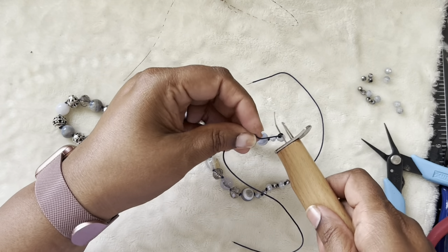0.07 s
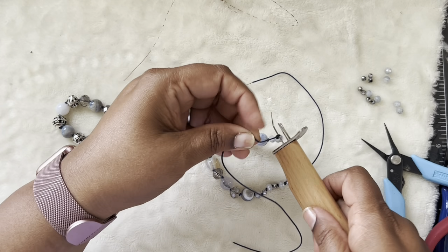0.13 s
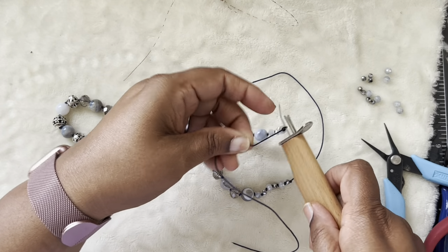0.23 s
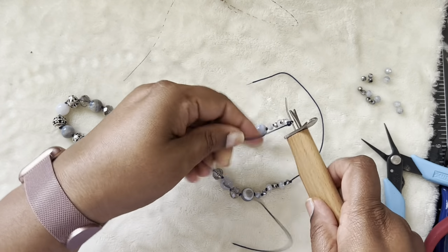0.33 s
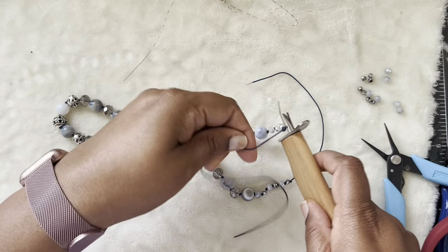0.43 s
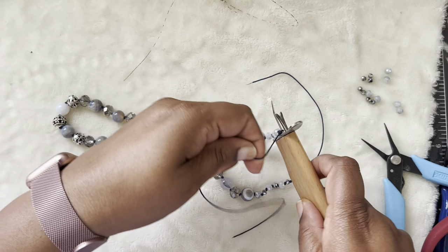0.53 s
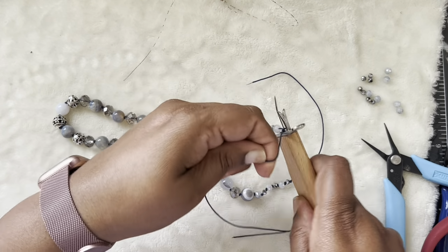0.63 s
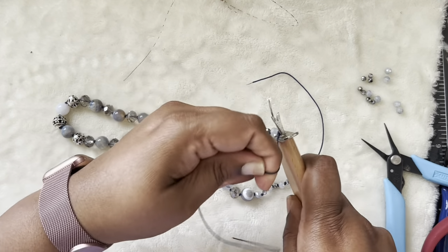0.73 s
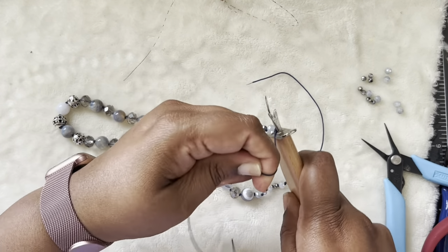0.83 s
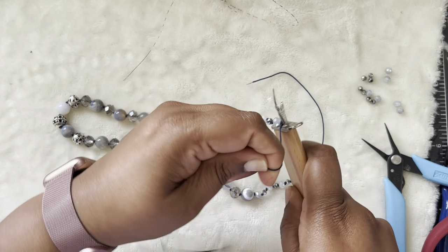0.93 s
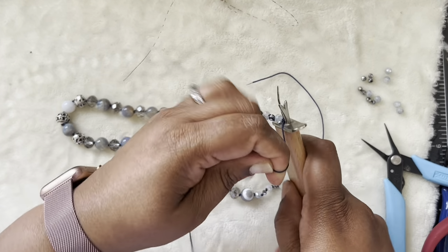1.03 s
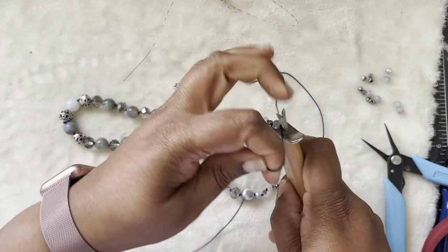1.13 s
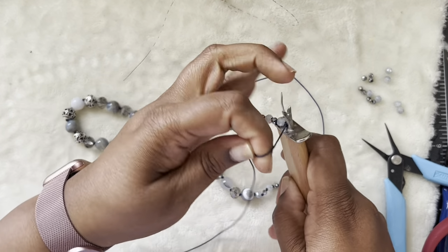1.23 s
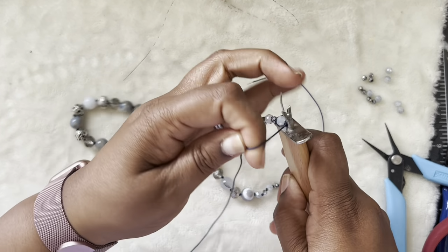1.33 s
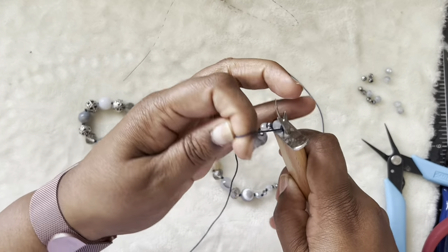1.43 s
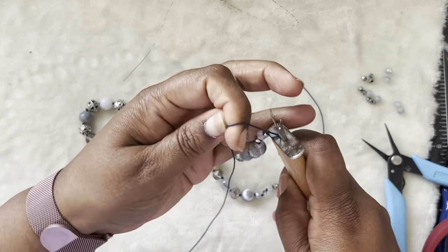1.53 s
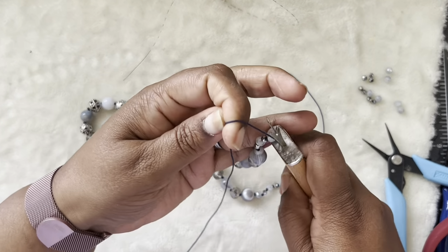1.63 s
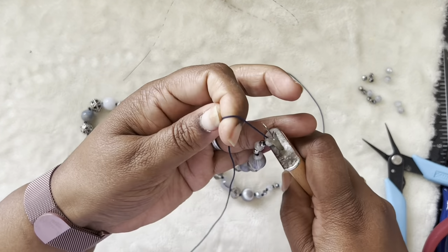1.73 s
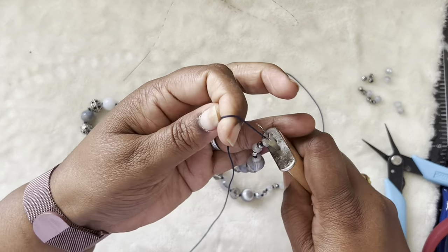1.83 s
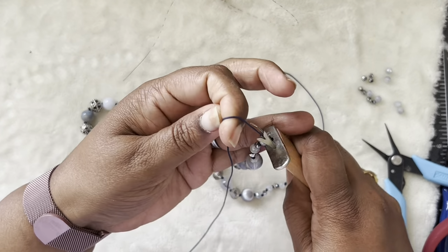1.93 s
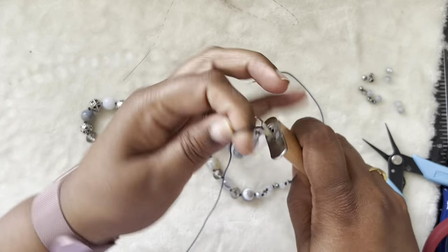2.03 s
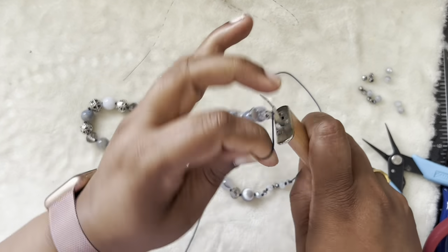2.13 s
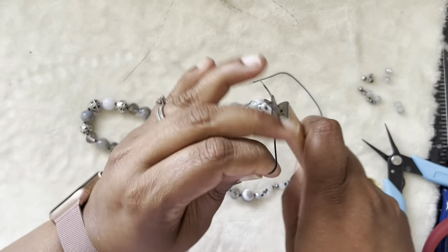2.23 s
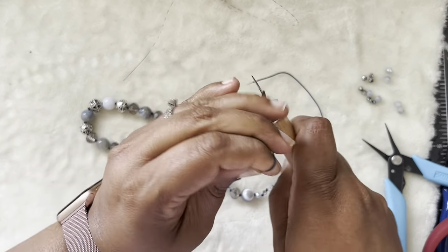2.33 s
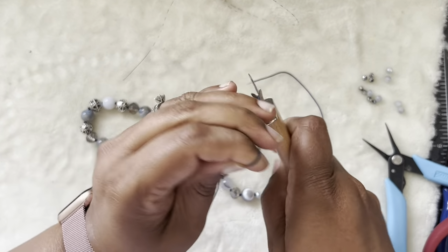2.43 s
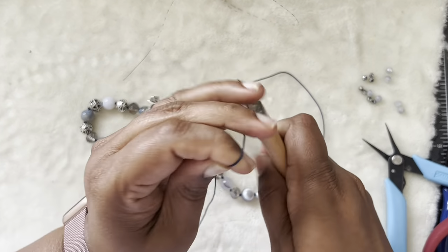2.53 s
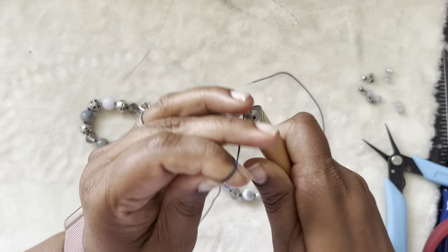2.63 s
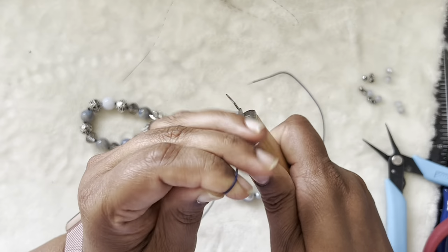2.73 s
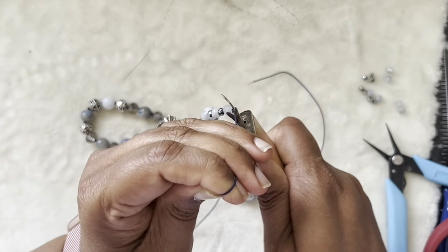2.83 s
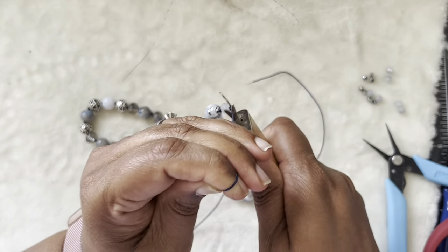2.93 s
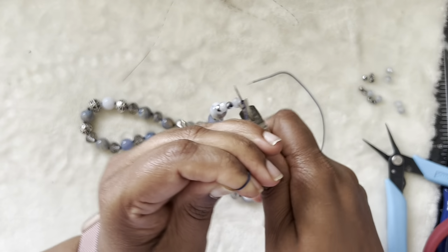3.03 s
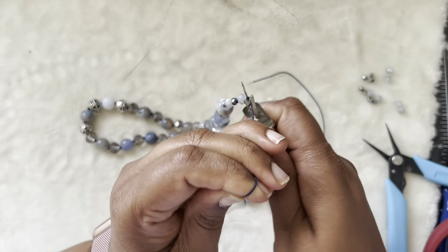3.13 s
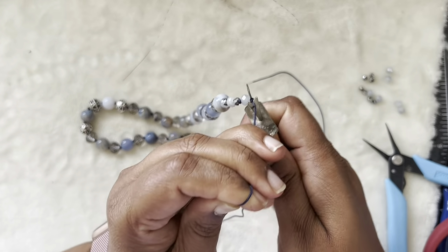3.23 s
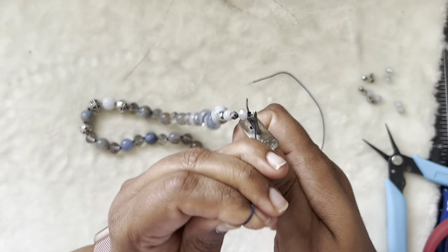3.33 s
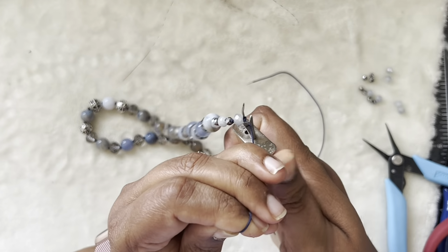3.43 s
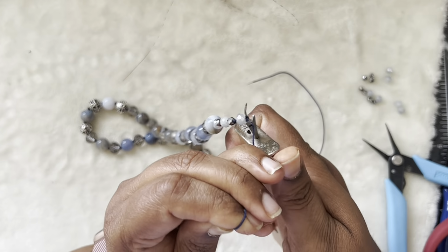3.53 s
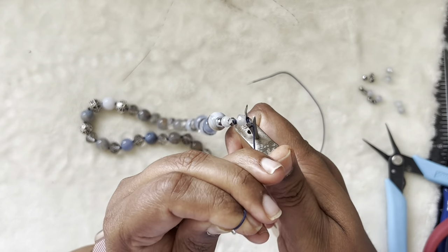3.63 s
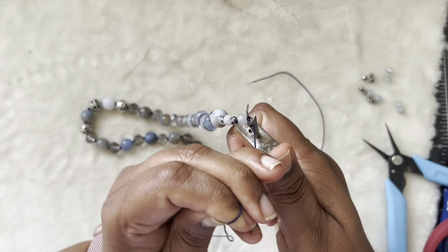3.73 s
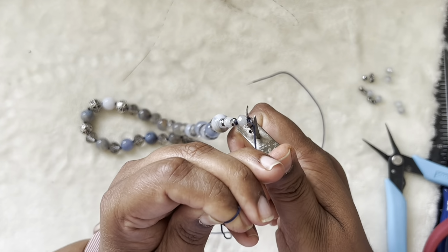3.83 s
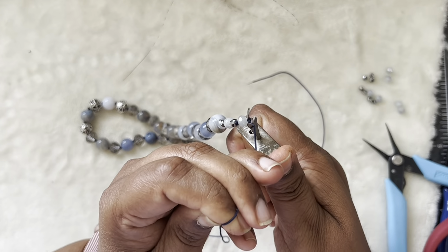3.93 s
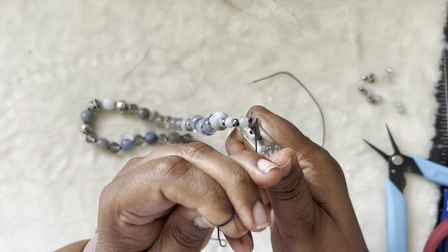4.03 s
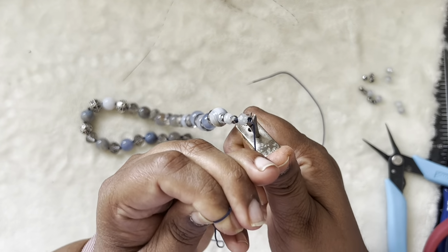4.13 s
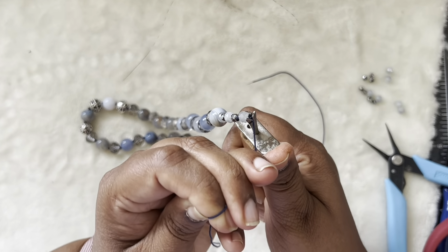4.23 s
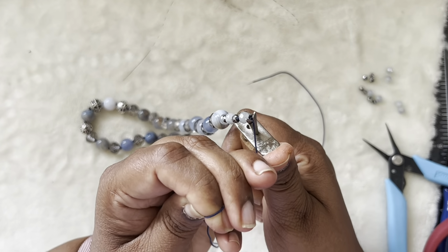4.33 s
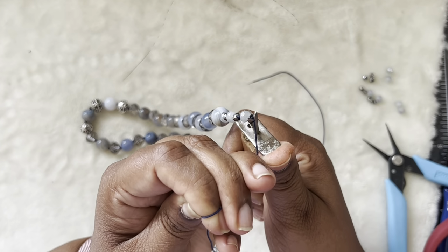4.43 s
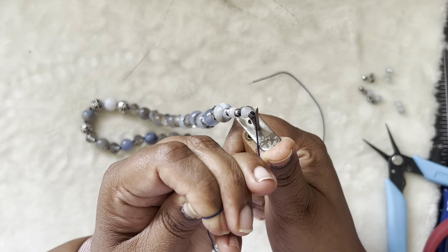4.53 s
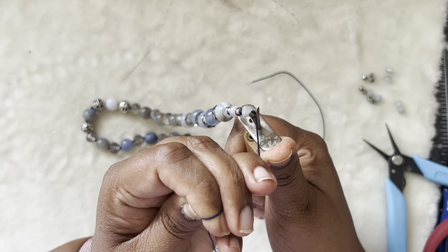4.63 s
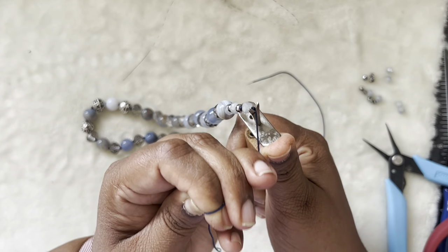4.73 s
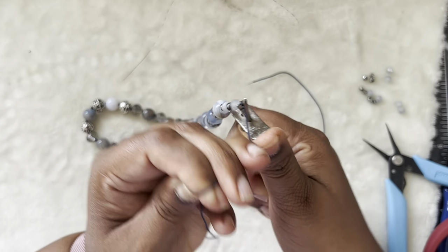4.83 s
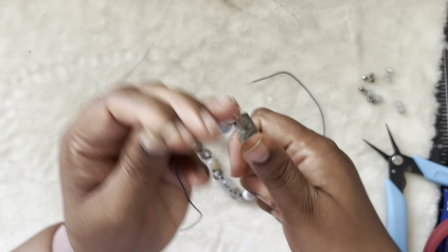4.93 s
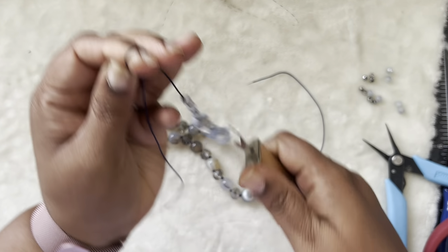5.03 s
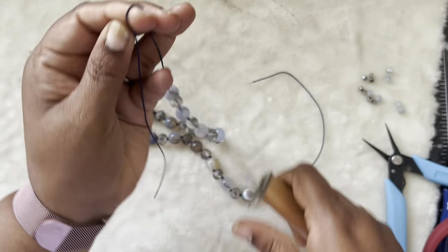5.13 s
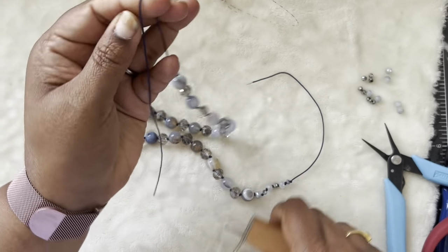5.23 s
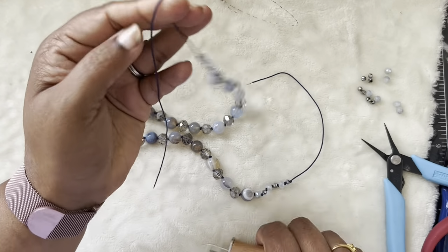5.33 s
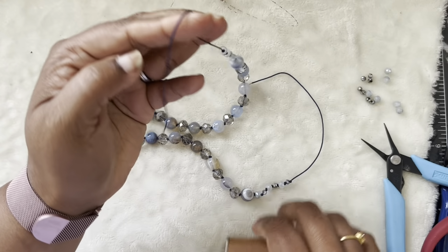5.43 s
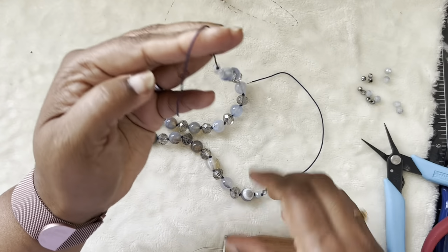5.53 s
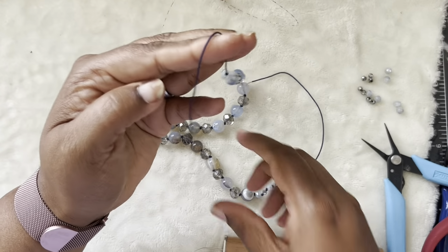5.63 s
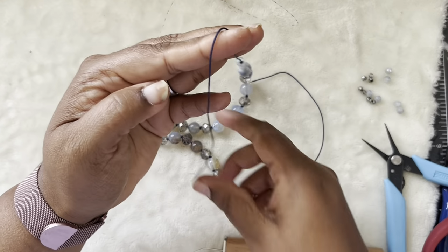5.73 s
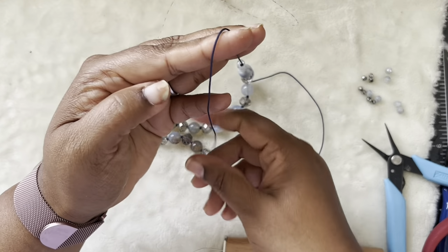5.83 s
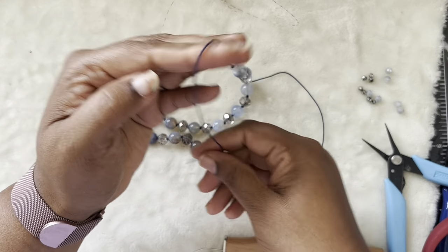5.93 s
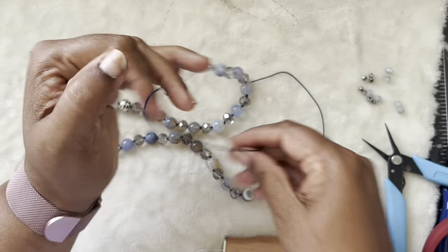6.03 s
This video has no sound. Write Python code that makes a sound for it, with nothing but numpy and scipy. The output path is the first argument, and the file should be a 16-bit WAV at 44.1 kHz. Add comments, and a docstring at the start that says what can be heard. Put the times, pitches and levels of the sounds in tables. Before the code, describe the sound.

Close above a cloth-covered table in a small, fairly dry room, hands knot cord between beads. Faint bright ticks and brief gritty cord scrapes with thin squeaks come first, over low motor hum and rumble. A distant soft whoosh swells and fades. After a quieter stretch, ticks gather into a sharp metal snap, cord rubs again, then the tool lands with a hard clack and dull thud, followed by soft cloth brushing and a last low bump.

```python
"""Hands knot a cord between small stone beads with a wood-handled metal tool, over a cloth-covered table.
From the start the rubbed cord squeaks, beads tick as short rings and the cord drags as gritty filtered noise.
A far whoosh, slow noise in one band, swells and fades; from 2.6 s hands also brush the cloth.
At 4.5 s the tool's sprung head snaps, at 5.3 s the tool is set down: chattering contacts strike their modes.
Motor and mains hum (sines) and room rumble (noise) run throughout; a close two-port microphone listens above."""
import sys
import numpy as np
from scipy import signal
from scipy.fft import rfft, irfft, next_fast_len
from scipy.io import wavfile

SR = 44100
rng = np.random.default_rng(int(sys.argv[2]) if len(sys.argv) > 2 else 0)


def invert_db(x):
    """Field ratio 10**(x/20) for x, a level in decibels (scalar or array-like)."""
    u = np.asarray(x, float) / 20
    return 10 ** u


def materialize(psi):
    """Save the field psi as 16-bit PCM at rate SR to the path in sys.argv[1].

    A 1-D psi becomes a single channel; in a 2-D psi each row is a channel.
    """
    bounded = np.clip(np.atleast_2d(psi).T, -1, 1)
    quanta = np.round(bounded * 32767).astype(np.int16)
    wavfile.write(sys.argv[1], SR, quanta)


N = 268039


def at_hz(points, hz):
    """Reads a curve between its points on a log frequency axis."""
    f, value = np.transpose(points)
    return np.interp(np.log(hz), np.log(f), value)


def rms_one(x):
    """Scales to an rms of one."""
    return x / np.sqrt(np.mean(x ** 2) + 1e-20)


def peak_one(x):
    """Scales to a peak of one."""
    return x / np.max(np.abs(x) + 1e-20)


def band(x, low_hz, high_hz):
    """A band with gentle edges."""
    sos = signal.butter(2, [low_hz, min(high_hz, .45 * SR)], "band", fs=SR, output="sos")
    return signal.sosfilt(sos, x)


def steep(x, low_hz, high_hz):
    """A band with steep edges."""
    return band(band(x, low_hz, high_hz), low_hz, high_hz)


def ring(x, hz, t60):
    """A resonance: a unit click sets a decaying sine of starting height 1 ringing."""
    r, w = invert_db(-60 / (t60 * SR)), 2 * np.pi * hz / SR
    return signal.lfilter([0, np.sin(w)], [1, -2 * r * np.cos(w), r * r], x + 1e-18)


def add(out, s, x):
    """Lays a short sound into out from time s on."""
    at = round(s * SR)
    out[at:at + len(x)] += x[:N - at]


def contact(ms, size):
    """Hard surfaces chatter for a moment: noise that rises fast and dies."""
    t = np.arange(size) / SR * 1000 / max(ms, .1)
    return rng.standard_normal(size) * np.sqrt(t) * np.exp(-1.6 * t)


def grit(size, spread_db):
    """Fibres catch unevenly: noise with a long-tailed size."""
    catch_db = spread_db * np.minimum(rng.exponential(1, size), 5)
    return rms_one(rng.standard_normal(size) * invert_db(catch_db))


def slipping(size, slip_db):
    """Stick and slip: gritty noise whose level flutters at 25-100 Hz."""
    flutter = rms_one(band(rng.standard_normal(size), 25, 100))
    return invert_db(slip_db * flutter) * grit(size, spread_db=3.5)


def swell(start, top, end, peak_db, roundness):
    """Gain of one movement, up to its peak and back; roundness (rise, fall): 1 is straight in dB, more is fuller."""
    quiet_db = -98
    t = np.arange(round(start * SR), round(end * SR)) / SR
    rise = np.abs((top - t) / (top - start)) ** roundness[0]
    fall = np.abs((t - top) / (end - top)) ** roundness[1]
    away = np.where(t < top, rise, fall)
    gain = invert_db(peak_db + (quiet_db - peak_db) * away) * signal.windows.tukey(len(t), .1)
    return gain[t >= 0]


def ticks():
    """Each touch rings a few cycles at its own pitch, with a crack around it, a dull knock and a bright edge."""
    # beads and prongs touching: t/s, peak level/dB, ring f/Hz, dull knock level/dB, bright edge level/dB
    touches = [(0.0415, -60, 6000, -92, -93), (0.2978, -68, 7240, -80, -65),
               (0.3108, -55.5, 5640, -77, -56.5), (0.639, -51, 5400, -77, -45),
               (0.6507, -55, 3950, -85, -44), (0.8687, -67.5, 2860, -67.5, -62),
               (0.9616, -65, 2800, -83, -71), (1.0274, -56, 6300, -82, -56), (1.046, -50, 6700, -66, -54),
               (1.0848, -50.5, 3250, -70, -48.5), (1.2557, -65.5, 3250, -82, -78),
               (1.3981, -63.5, 3400, -83, -51.5), (1.5454, -70, 2230, -70, -85),
               (1.5907, -63.5, 5300, -72.5, -72), (1.6844, -66, 5930, -78, -81),
               (1.723, -76, 3070, -75, -68), (1.7988, -63.5, 5600, -85, -78), (1.9684, -70, 7490, -77, -66),
               (1.9866, -59, 6200, -78, -54.5), (2.1087, -43, 5900, -70, -75),
               (2.1817, -51.5, 3230, -70, -50.5), (2.8766, -69.5, 2600, -78, -77),
               (2.923, -60, 6550, -65, -60.5), (3.059, -58, 5300, -61, -51),
               (3.0863, -47, 3560, -57.5, -34), (3.9498, -67, 5940, -73, -67),
               (3.9826, -64.5, 7280, -73, -65), (3.995, -69, 2600, -80, -82),
               (4.0118, -69, 7250, -74, -66.5), (4.0495, -67, 7360, -80, -67),
               (4.0848, -64, 6000, -75, -62), (4.121, -62, 7300, -74, -60),
               (4.1521, -51.5, 6650, -64.5, -51), (4.1906, -62, 6350, -76, -61),
               (4.2834, -59, 6560, -66, -57), (4.3851, -50.5, 6500, -59.5, -54),
               (4.481, -47.5, 4700, -58.5, -49), (4.5668, -43, 5000, -64, -45.5),
               (4.823, -54.5, 4900, -66, -66), (4.894, -54, 6800, -72, -47), (4.925, -44.5, 3940, -74, -33),
               (4.9303, -67, 2410, -54, -64), (5.0152, -70, 7340, -87, -67),
               (5.2281, -62, 2380, -47.5, -75), (5.418, -51, 3370, -52, -82),
               (6.058, -69, 2580, -54, -80.5)]
    out = np.zeros(N)
    for s, peak_db, hz, knock_db, edge_db in touches:
        hit = contact(ms=1.2, size=1500)
        crack = steep(hit, .45 * hz, 7800)
        body = peak_one(ring(crack, hz, 20 / hz)) + invert_db(-4) * peak_one(crack)
        knock = peak_one(steep(hit, 1000, 1900))
        edge = peak_one(steep(hit, 6200, 15500))
        add(out, s, invert_db(peak_db) * peak_one(body) + invert_db(knock_db) * knock + invert_db(edge_db) * edge)
    return out


def slides():
    """Gritty friction of the cord: a scrape coloured by the prongs and a bright hiss."""
    # drags over beads and prongs: start t/s, peak t/s, end t/s, broad scrape level/dB, bright hiss level/dB
    drags = [(0.283, 0.303, 0.42, -78, -75.5), (0.572, 0.64, 0.725, -70.5, -73),
             (0.943, 1.003, 1.16, -78, -80), (1.004, 1.042, 1.085, -66.5, -64),
             (1.485, 1.498, 1.525, -82, -99), (2.104, 2.13, 2.26, -78.5, -82.5),
             (2.491, 2.536, 2.63, -79.5, -73), (2.715, 2.753, 2.8, -85, -83),
             (2.954, 3.003, 3.06, -76.5, -72.5), (2.989, 3.045, 3.19, -72.5, -69.5),
             (3.309, 3.35, 3.44, -81, -95), (4.757, 4.834, 4.9, -70.5, -83), (4.803, 4.912, 5.01, -64, -59)]
    # prong resonances under the cord: f/Hz, width/Hz, mean level/dB (varies from drag to drag)
    prong_modes = [(3680, 470, -5), (5100, 250, 0.5), (6000, 490, -4), (7430, 250, -3)]
    scrape_round, hiss_round = (1.8, 1.37), (1.76, 1.03)
    out = np.zeros(N)
    for start, top, end, scrape_db, hiss_db in drags:
        push = swell(start, top, end, scrape_db, scrape_round)
        rub = slipping(len(push), slip_db=1.9)
        prongs = rms_one(sum(invert_db(db + rng.normal(0, 2.5)) * rms_one(ring(rub, hz, 0.98 / width))
                             for hz, width, db in prong_modes))
        scrape = rms_one(rms_one(steep(rub, 1660, 5700)) + invert_db(3.5) * prongs)
        hiss = rms_one(band(band(rub, 6140, 11500), 6000, 18000))
        add(out, start, push * scrape + swell(start, top, end, hiss_db, hiss_round) * hiss)
    return out


def cord_squeaks():
    """Narrow squeaks of the rubbed cord: stick-slip noise coloured by its free length or by the tool's prongs."""
    # squeaks: start t/s, peak t/s, end t/s, squeak level/dB, squeak f/Hz
    squeaks = [(-0.08, 0.037, 0.1, -71.5, 5200), (0.066, 0.093, 0.16, -65, 5170),
               (0.148, 0.202, 0.28, -80, 5100), (0.288, 0.308, 0.4, -70, 5270),
               (0.596, 0.651, 0.69, -64, 5500), (0.6, 0.64, 0.72, -68, 4200),
               (1.047, 1.096, 1.16, -82, 2800), (1.216, 1.26, 1.31, -79, 3200),
               (2.12, 2.167, 2.27, -76.5, 3000), (2.72, 2.754, 2.8, -83, 2600),
               (3.31, 3.35, 3.41, -84, 2290), (4.754, 4.798, 4.96, -71.5, 3750),
               (4.758, 4.83, 4.95, -71, 5100)]
    half_width_hz = 400
    out = np.zeros(N)
    for start, top, end, squeak_db, hz in squeaks:
        gain = swell(start, top, end, squeak_db, roundness=(1.6, 1.2))
        rub = slipping(len(gain), slip_db=3.5)
        squeak = rms_one(steep(rub, hz - half_width_hz, hz + half_width_hz))
        add(out, max(start, 0), gain * squeak)
    return out


def blow(event, modes):
    """One chattering contact cracks and strikes every mode; loose parts rattle on, rubbing the modes more evenly."""
    out, size = np.zeros(N), 9000
    s, peak_db, ms, rattle_db, rattle_s = event
    t = np.arange(size) / SR
    both = np.array([contact(ms, size), slipping(size, slip_db=1.8)])  # strike, rub
    crack, chatter = steep(both, 2800, 13500) + invert_db(-5) * band(both, 800, 1900)
    struck, rubbed = 0, 0
    for hz, db, t60 in modes:
        strike, rub = steep(both, hz / 1.13, hz * 1.13)
        struck = struck + invert_db(db) * peak_one(ring(strike, hz, t60))
        rubbed = rubbed + invert_db(.55 * db) * rms_one(ring(rub, hz, t60))
    rings = peak_one(struck) + invert_db(-8.5) * peak_one(crack)
    rattle = rms_one(rubbed) + invert_db(-3.0) * rms_one(chatter)
    rattle_gain = invert_db(rattle_db - 60 * t / rattle_s) * (1 - np.exp(-t / .003))
    add(out, s, invert_db(peak_db) * peak_one(rings) + rattle_gain * rms_one(rattle))
    return out


def head_snap():
    """The sprung head snaps back and its contact excites the short modes of the head."""
    # the snap: t/s, peak level/dB, contact time/ms, rattle level/dB, rattle t60/s
    snap = (4.5017, -16.5, 1.25, -48.5, 0.19)
    # modes of the head: f/Hz, relative level/dB, t60/s
    head_modes = [(3250, -16, 0.0067), (3730, -2, 0.01), (4450, -14, .008), (4900, -9, .008),
                  (6500, -16, .008), (8500, -7, .008), (9050, -5.5, .007), (9590, -14, 0.0072),
                  (11550, -3, 0.0059), (11850, -5.5, 0.0095), (15400, -17.5, .004)]
    return blow(snap, head_modes)


def set_down():
    """The tool lands and its contact excites the modes of the whole tool."""
    # the landing: t/s, peak level/dB, contact time/ms, rattle level/dB, rattle t60/s
    landing = (5.2977, -14.5, .42, -53.5, .175)
    # modes of the whole tool: f/Hz, relative level/dB, t60/s
    tool_modes = [(940, -27, .009), (1260, -32, .009), (1560, -31, .01), (1900, -32, .008), (3000, -2, .01),
                  (3350, -4.5, .009), (4065, -15.5, 0.0099), (4690, -17.5, 0.0096), (5600, -20, .007),
                  (6850, -12, 0.013), (7980, -18.5, 0.013), (8600, -19, .007), (11300, -18.5, .013)]
    return blow(landing, tool_modes)


def thuds():
    """A soft push into the table top favours the table modes near its own pitch."""
    # pushes: t/s, peak level/dB, softness f/Hz
    pushes = [(3.058, -51, 630), (3.089, -57, 500), (4.0, -57, 200), (4.501, -45.5, 451.5),
              (4.505, -48.5, 160), (4.93, -61, 600), (5.004, -45.5, 150), (5.227, -51, 700),
              (5.295, -42.5, 300), (5.3, -30, 435), (5.301, -31.5, 188.4), (5.445, -52.5, 130),
              (6.029, -49, 160), (6.052, -38.5, 168), (6.058, -45, 450), (6.066, -50, 330)]
    # modes of the table top: f/Hz, mean level/dB (varies from push to push), t60/s
    table_modes = [(121, -1, 0.1), (163, 3, .12), (210, 0.5, .09), (240, 2, 0.088), (297, -5, 0.069),
                   (363, -1.5, 0.063), (430, -1, .06), (490, -0.5, 0.039), (630, -5.5, .03),
                   (800, -11, 0.016)]
    out, click = np.zeros(N), np.eye(1, 12000)[0]
    for s, peak_db, soft_hz in pushes:
        push = band(click, 0.65 * soft_hz, 1.6 * soft_hz)
        rings = sum(invert_db(db + rng.normal(0, 1.5)) * ring(push, hz, t60) for hz, db, t60 in table_modes)
        add(out, s, invert_db(peak_db) * peak_one(rings))
    return out


def cloth():
    """Soft, smooth friction: one dull resonance and a broad brush."""
    # a hand or forearm moves: start t/s, peak t/s, end t/s, ring level/dB, broad brush level/dB
    strokes = [(2.576, 2.68, 3.1, -76.5, -89), (5.17, 5.263, 5.42, -81, -79), (5.251, 5.53, 5.71, -78, -76),
               (5.903, 6.09, 6.2, -79, -80)]
    cloth_hz, cloth_t60_s, roundness = 1410, .007, (2.1, 2.2)
    out = np.zeros(N)
    for start, top, end, ring_db, brush_db in strokes:
        ring_gain = swell(start, top, end, ring_db, roundness)
        brush_gain = swell(start, top, end, brush_db, roundness)
        rub = slipping(len(brush_gain), slip_db=1.2)
        ringing = rms_one(ring(ring(rub, cloth_hz, cloth_t60_s), cloth_hz, cloth_t60_s))
        brush = rms_one(steep(rub, 850, 3700) + 1.2 * steep(rub, 900, 1500))
        add(out, start, ring_gain * ringing + brush_gain * brush)
    return out


def hum():
    """Steady sines; the two lowest beat slowly."""
    # motor turning just under mains speed, mains, twice mains: f/Hz, rms level/dB
    tones = [(57.2, -52.5), (59.9, -69), (119.9, -60)]
    t = np.arange(N) / SR
    return sum(np.sqrt(2) * invert_db(db) * np.sin(2 * np.pi * hz * t) for hz, db in tones)


def whoosh():
    """Diffuse noise around 700 Hz, about half alike on the two sides, swells and fades far away."""
    # course of the whoosh: t/s, level/dB
    course = [(0, -85), (.6, -89), (1.2, -85.5), (1.5, -80.5), (2.2, -79.5), (2.9, -79.5), (3.3, -82.5),
              (3.6, -96), (5, -94), (6.08, -93)]
    s, db = np.transpose(course)
    mid, side = band(band(rng.standard_normal((2, N)), 600, 900), 480, 950)
    gain = invert_db(np.interp(np.arange(N) / SR, s, db))
    return gain * rms_one(mid + 0.53 * side * [[1], [-1]])


def floor():
    """Room rumble and microphone hiss: bands of stereo noise, each with its own level and likeness."""
    # noise spectrum: f/Hz, level per Hz/dB
    spectrum = [(25, -103), (32, -91), (40, -75.5), (62, -70.5), (95, -75.5), (140, -85.5), (200, -103),
                (300, -104), (500, -110), (1000, -117), (2000, -122), (4000, -127), (8000, -129),
                (12000, -136), (16000, -140)]
    # left-right likeness: f/Hz, correlation (1 = the same on both sides)
    likeness = [(60, 0.94), (130, 0.94), (290, 0.3), (640, .25), (1400, .25), (3100, 0.88), (6800, 0.61),
                (15000, 0.24)]
    out, edges = 0, 24 * 2 ** np.arange(0, 9.6, .4)  # bands 0.4 octave wide
    white = rng.standard_normal((2, 2, N + SR))
    for k, (low, high) in enumerate(zip(edges, edges[1:])):
        mid, side = band(white[k % 2], low, high)[:, SR:]  # neighbouring bands use separate noise
        hz = np.sqrt(low * high)
        alike = np.clip(at_hz(likeness, hz), -1, 1)
        stereo = np.sqrt(1 + alike) * mid + np.sqrt(1 - alike) * side * [[1], [-1]]
        out = out + invert_db(at_hz(spectrum, hz)) * stereo
    return out * np.sqrt(SR / 4)  # brings the white noise to unit power per Hz


def room(x):
    """Eight feedback delays a side, duller on every round."""
    room_t60_s, wall_cut_hz = .26, 9000
    size = next_fast_len(N + SR)
    turn = np.exp(-2j * np.pi * np.arange(size // 2 + 1) / size)  # delay of one sample
    dull = np.exp(-2 * np.pi * wall_cut_hz / SR)
    wall = (1 - dull) / (1 - dull * turn)
    lags = (rng.uniform(.004, .02, (2, 8)) * SR).astype(int)
    spectrum = rfft(x, size)
    out = []
    for side in lags:
        loops = [invert_db(-60 * d / SR / room_t60_s) * wall * np.exp(d * np.log(turn)) for d in side]
        echoes = sum((-1) ** k * g / (1 - g) for k, g in enumerate(loops))
        out.append(irfft(spectrum * echoes, size)[:N])
    return np.array(out)


def pair(x):
    """The left port is a little nearer: louder and earlier."""
    left_db, lag_us, edge = 1.5, 18, 2000
    wide = np.pad(x, edge, mode="reflect")  # keeps the delay from wrapping round the ends
    hz = np.arange(len(wide) // 2 + 1) * SR / len(wide)
    late = irfft(rfft(wide) * np.exp(-2j * np.pi * hz * lag_us * 1e-6), len(wide))[edge:-edge]
    return np.array([x * invert_db(left_db / 2), late * invert_db(-left_db / 2)])


def scene():
    """Places hands and table before the two ports, then adds their echoes and the background."""
    hands = ticks() + slides() + cord_squeaks() + head_snap() + set_down() + cloth()
    table = thuds()
    # the table top sounds further left and more diffuse
    table_left_db, table_room_db, hands_room_db = 1.0, -25, -29
    table_pair = pair(table) * invert_db(table_left_db * np.array([[.5], [-.5]]))
    echoed = invert_db(hands_room_db) * hands + invert_db(table_room_db) * table
    return pair(hands + hum()) + table_pair + room(echoed) + floor() + whoosh()


def low_pass(x):
    """Removes everything above the highest recorded frequency."""
    return signal.sosfilt(signal.butter(12, 17010, fs=SR, output="sos"), x)


def record(dry):
    """The microphone housing lifts and notches the treble; the very top falls away."""
    # resonances and notches of the housing: f/Hz, width/Hz, level/dB
    housing = [(8700, 1700, 4.5), (10110, 700, -17), (11800, 1600, 4.5), (14000, 400, -24.5),
               (15300, 1200, 6.5)]
    for hz, width, db in housing:
        w, g = 2 * np.pi * hz / SR, invert_db(db / 2)
        a = np.pi * width / SR
        lift = [1 + a * g, -2 * np.cos(w), 1 - a * g]
        damping = [1 + a / g, -2 * np.cos(w), 1 - a / g]
        dry = signal.lfilter(lift, damping, dry)
    mix = signal.sosfilt(signal.butter(6, 16300, fs=SR, output="sos"), dry)
    return low_pass(mix)


dry = scene()
out = record(dry)
materialize(out)
```